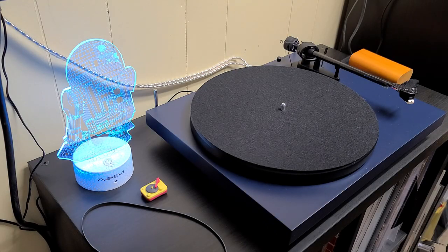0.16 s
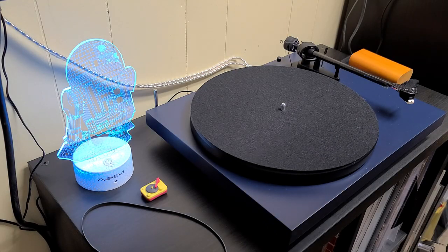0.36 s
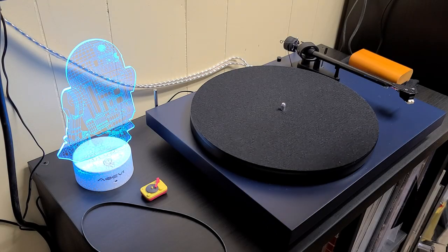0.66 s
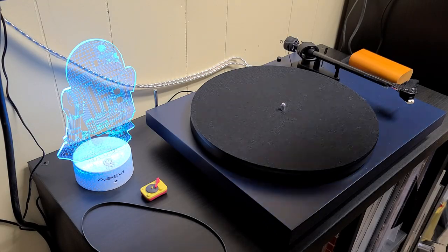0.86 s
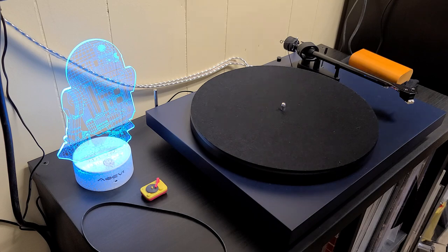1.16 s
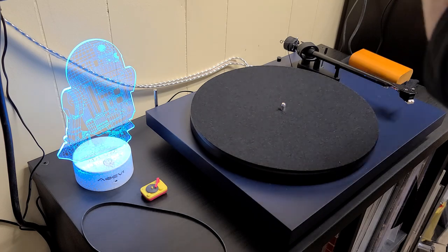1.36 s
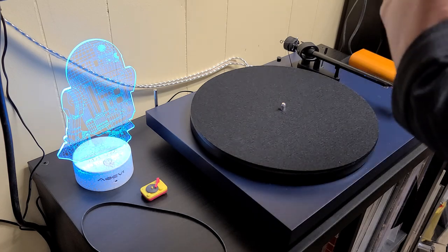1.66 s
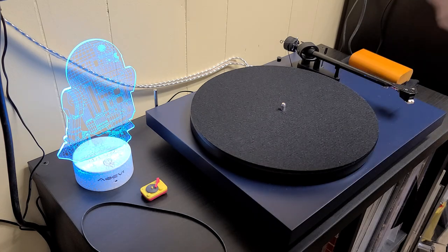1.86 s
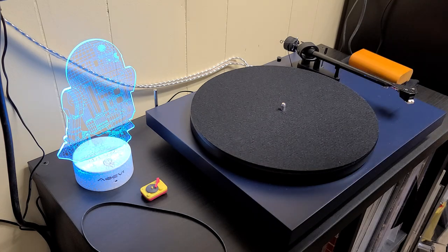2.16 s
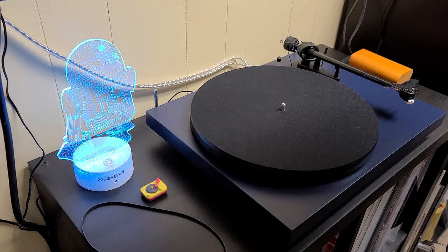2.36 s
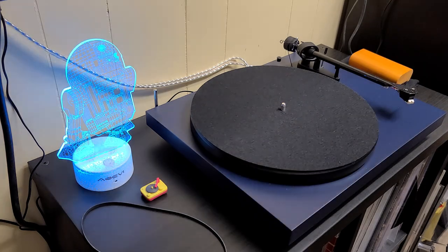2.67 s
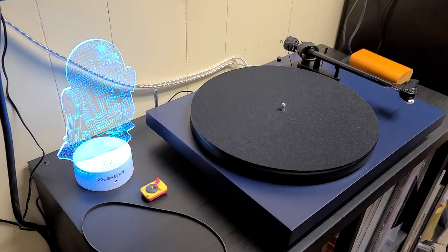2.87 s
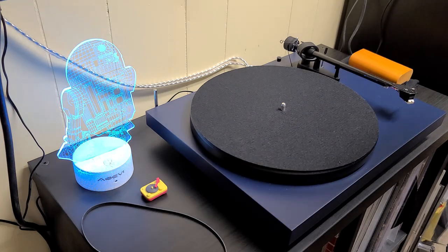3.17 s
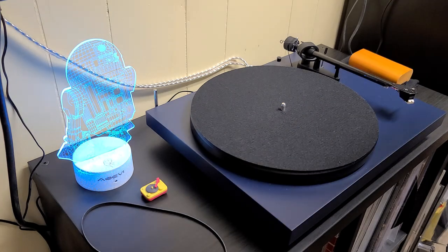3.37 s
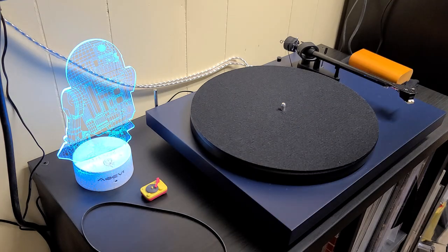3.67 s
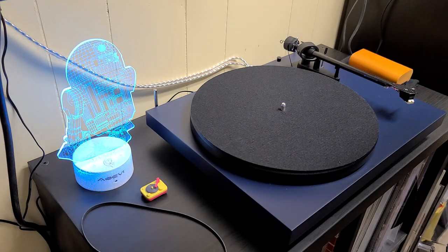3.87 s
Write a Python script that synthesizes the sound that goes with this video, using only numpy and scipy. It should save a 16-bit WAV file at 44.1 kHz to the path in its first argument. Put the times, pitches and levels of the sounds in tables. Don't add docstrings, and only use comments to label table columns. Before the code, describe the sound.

Close, dry paper rustling swells into crisp snaps and a single shelf knock, followed by squeaky sliding, light taps and two brief scrapes.

```python
import sys
import numpy as np
from scipy import signal
from scipy.fft import rfft, irfft, next_fast_len
from scipy.io import wavfile
from scipy.ndimage import uniform_filter1d

SR = 44100
rng = np.random.default_rng(int(sys.argv[2]) if len(sys.argv) > 2 else 0)


def master_out(mix):
    frames = np.transpose(np.atleast_2d(mix))
    ceiling = np.clip(frames, -1, 1)
    pcm = np.round(ceiling * 32767).astype(np.int16)
    wavfile.write(sys.argv[1], SR, pcm)


def elevation(decibels):
    levels = np.asarray(decibels, float)
    return 10 ** (levels / 20)


N = 177626


def evened(x):
    return x / np.sqrt(np.mean(x ** 2) + 1e-20)


def smooth_noise(size):
    return evened(uniform_filter1d(uniform_filter1d(rng.standard_normal(N), size), size))


def read(points, hz):
    f, value = np.transpose(points)
    return np.interp(np.log(hz + 1), np.log(f + 1), value)


def along(rows):
    s, *columns = np.transpose(rows)
    return [np.interp(np.arange(N) / SR, s, c) for c in columns]


def coloured(x, points):
    size = next_fast_len(N)
    gain = elevation(read(points, np.fft.rfftfreq(size, 1 / SR)))
    return evened(irfft(rfft(x, size) * gain, size)[..., :N])


def resonate(x, hz, width):
    r = np.exp(-np.pi * width / SR)
    return 2 * signal.lfilter([1 - r], [1, -r * np.exp(2j * np.pi * hz / SR)], x).real


def glide(x, hz, width):
    turn = np.exp(2j * np.pi * np.cumsum(hz) / SR)
    r = np.exp(-np.pi * width / SR)
    return 2 * (turn * signal.lfilter([1 - r], [1, -r], x / turn)).real


# pitch_hz, share
SHARED_PART = [(60, 0.7), (300, 1), (800, 0.46), (2000, 0.46), (5000, 0.024), (15000, 0.054)]
LATE_LEFT = 18


def paired(make, lag=LATE_LEFT):
    size = next_fast_len(N)
    same = np.clip(read(SHARED_PART, np.fft.rfftfreq(size, 1 / SR)), 0, 1)
    shared = make()
    common = rfft([np.roll(shared, lag), shared], size)
    alone = rfft([make(), make()], size)
    both = common * np.sqrt(same) + alone * np.sqrt(1 - same)
    return irfft(both, size)[:, :N]


def add(mix, s, sound, pan_db, lag=LATE_LEFT):
    at = round(s * SR)
    for channel, start, db in ((0, at + lag // 2, pan_db / 2), (1, at - lag // 2, -pan_db / 2)):
        part = mix[channel, start:][:len(sound)]
        part += elevation(db) * sound[:len(part)]


def slips(per_s, spread_db):
    size = elevation(spread_db * np.minimum(rng.exponential(1, N), 5)) * rng.standard_normal(N)
    return evened(size * (rng.random(N) < per_s / SR))


def flicker(size, depth_db):
    return elevation(depth_db * smooth_noise(size))


RISE_POWER, STOP_POWER, DIE_POWER = 1.84, 2.97, 1


def movement(full, rise, stop, stop_power=STOP_POWER):
    t = np.arange(0, N + 64, 64) / SR - full
    progress = np.where(t < 0, t / rise, t / stop)
    bend = np.where(t < 0, RISE_POWER, stop_power)
    return np.clip(progress, -1, 1), elevation(-40 * abs(progress) ** bend)


def filled(power):
    return np.interp(np.arange(N) / 64, np.arange(len(power)), np.sqrt(power))


# pitch_hz, level_db per Hz
AIR = [(60, -1.5), (125, -11), (250, -5), (600, -10.5), (1300, -19.5), (2800, -17.5), (4500, -24.5),
       (6000, -27.5), (11000, -25), (15600, -26.5)]
AIR_DB = -72.5
# time_s, first_level_db, second_above_first_db
HUM = [(1.7, -56, -20), (2.5, -63.5, 1), (3.4, -60, 3), (4.03, -68, 5)]
HUM_HZ, BEAT_HZ, DIP_S = 57.9, 2.16, 3.4


def air():
    hum = np.sqrt(2) * np.exp(2j * np.pi * np.cumsum(HUM_HZ + 2.54 * smooth_noise(4000)) / SR)
    first_db, second_db = along(HUM)
    beat = 1 - elevation(second_db) * np.exp(2j * np.pi * BEAT_HZ * (np.arange(N) / SR - DIP_S))
    hiss = coloured(rng.standard_normal((2, N)), AIR)
    return elevation(AIR_DB) * hiss + elevation(first_db - 15.0) * (hum * beat).imag


# full_s, rise_s, stop_s, level_db
SHIFTS = [(.15, 0.078, 0.15, -56.5), (.33, 0.15, 0.081, -61.5), (.58, 0.13, 0.18, -59),
          (.81, 0.048, 0.15, -59), (1.05, 0.24, 0.12, -53.5), (1.19, 0.034, 0.1, -51.5),
          (1.34, 0.12, 0.043, -68), (1.42, 0.056, 0.16, -67), (2.2, 0.13, 0.17, -63),
          (2.6, 0.094, 0.24, -72), (3.36, 0.018, 0.053, -72), (3.48, 0.036, 0.058, -73)]
# pitch_hz, level_db per Hz
RUMBLE_COLOUR = [(12, -58.5), (20, -4.5), (54, 2.5), (112, -3.5), (136, -7.5), (170, -7), (200, -12.5),
                 (300, -10), (390, -7), (660, -120)]


def rumble():
    power = elevation(2 * -72)
    for full, rise, stop, db in SHIFTS:
        power = power + elevation(2 * db) * movement(full, rise, stop)[1]
    jolts = paired(lambda: slips(360.0, spread_db=1.5))
    return elevation(-8.0) * filled(power) * coloured(jolts, RUMBLE_COLOUR) * elevation([[-1.2], [1.2]])


# full_s, rise_s, stop_s,
# sheet_level_db, fizz_above_sheet_db
PULLS = [(.15, 0.065, 0.14, -58, -3), (.225, 0.056, 0.038, -61, -3), (.39, 0.15, 0.16, -65.5, -3),
         (.53, 0.14, 0.077, -57.5, 3.5), (.595, 0.064, 0.021, -59, 1.5), (.73, 0.0099, 0.18, -65.5, -3),
         (.88, 0.12, 0.11, -70, 11), (1.03, 0.23, 0.062, -50, 1), (1.66, 0.055, 0.046, -76.5, 0),
         (1.908, .11, 0.29, -57, 5), (2.06, 0.27, 0.14, -57, -3.5), (2.14, 0.054, 0.039, -67.5, -1),
         (2.245, 0.11, 0.042, -65, 1.5), (2.3, 0.64, 0.039, -96.5, -33.5), (1.853, 0.013, 0.017, -62.5, 2),
         (2.45, 0.25, 0.28, -67, -6), (2.605, 0.13, 0.018, -66, -7.5), (2.68, 0.013, 0.027, -62.5, -8),
         (2.74, 0.19, 0.075, -67, -8), (2.92, 0.13, 0.12, -67, -2), (2.98, 0.086, 0.11, -76, -0.5),
         (3.08, .1, .2, -85, 2), (3.725, .04, 0.053, -82, 16), (3.93, 0.05, .045, -83, 16.5),
         (3.365, 0.016, .04, -75.5, 0)]
# full_s, rise_s, stop_s, sheet_level_db, fizz_above_sheet_db
CRUMPLES = [(1.1, 0.0081, 0.17, -60.5, 0.5), (1.155, 0.019, 0.026, -59.5, -6), (1.16, 0.014, 0.039, -64, 9),
            (1.198, 0.036, 0.038, -53.5, 1), (1.27, 0.078, 0.2, -68, 0), (1.41, 0.1, 0.0055, -67, 2.5),
            (1.467, 0.014, 0.1, -57, -7.5), (1.51, 0.011, 0.092, -52, -7.5), (1.528, 0.009, 0.017, -57, 2),
            (1.56, 0.006, 0.044, -51, -9), (1.571, 0.014, 0.012, -50, 3), (1.595, 0.031, 0.0089, -51.5, 1)]
# pitch_hz, level_db per Hz
FIZZ = [(2650, -47), (4500, -9), (4920, -4.5), (5400, -2), (7450, -0.5), (8060, 2), (11400, 2), (15600, -6)]
SHEET = [(880, -18.5), (1500, -9), (1660, -13), (1780, -7.5), (2380, -4), (2590, -0.5), (3540, 1.5),
         (6500, -12), (8450, -12), (14300, -120)]
POCKET = [(120, -53), (200, -17), (242, -17), (365, -7), (524, -2), (1400, -0.5), (1660, -2.5),
          (2200, -15.5), (2860, -57), (4840, -120)]
DULLING_DB = 1.5
POCKET_DB, POCKET_PER_FIZZ, SQUEEZE_DB, REST_DB = -8, -0.96, -0.5, -79
SLIDE_PAN_DB = -2.5


def slide():
    fizz, sheet, pocket = 0, 0, elevation(2 * REST_DB)
    for rows, squeeze_db, stop_power in ((PULLS, 0, STOP_POWER), (CRUMPLES, SQUEEZE_DB, DIE_POWER)):
        for full, rise, stop, db, fizz_db in rows:
            progress, power = movement(full, rise, stop, stop_power)
            pocket_db = db + POCKET_DB + POCKET_PER_FIZZ * fizz_db + squeeze_db
            fizz = fizz + power * elevation(2 * (db + fizz_db - DULLING_DB * progress))
            sheet = sheet + power * elevation(2 * db)
            pocket = pocket + power * elevation(2 * pocket_db)
    drive = paired(lambda: slips(14000., 1.3)) * flicker(size=100, depth_db=.8)
    out = filled(fizz) * coloured(drive, FIZZ) * flicker(size=400, depth_db=-1.0)
    out += filled(sheet) * coloured(drive, SHEET) * flicker(size=400, depth_db=0.77)
    out += filled(pocket) * coloured(drive, POCKET) * flicker(size=600, depth_db=2.2)
    return out * elevation([[SLIDE_PAN_DB / 2], [-SLIDE_PAN_DB / 2]])


def patchy(x, depth_db):
    z = signal.stft(x, nperseg=256)[2]
    field = rng.standard_normal(z.shape[1:])
    field = evened(uniform_filter1d(uniform_filter1d(field, size=3, axis=0), size=9, axis=1))
    gain = elevation(depth_db * field - 0.065 * depth_db ** 2)
    return signal.istft(z * gain, nperseg=256)[1][:, :N]


# start_s, peak_db, pitch_hz, cycles, sign
PUSHES = [(0.13, -63, 55, 1.4, 1), (.19, -60, 69.6, 1.6, 1), (0.236, -50.5, 61, 1.2, 1),
          (.263, -63, 45, 1.6, 1), (.402, -63, 62, 0.99, 1), (0.311, -58.5, 90, 1.2, 1),
          (0.476, -59, 60, 1, 1), (.522, -60, 50, 1.1, 1), (0.548, -54, 56.3, 2.5, -1),
          (0.605, -58, 57.7, 1.46, 1), (0.624, -57, 61.3, 1.8, 1), (.664, -59, 80, 1.63, -1),
          (.79, -56, 62, 1.85, 1), (0.841, -56.5, 51, 1.48, 1), (0.894, -58, 59.7, 1.24, 1),
          (1.16, -57, 55, 1.2, 1), (1.213, -58.5, 60.4, 1.7, 1), (1.547, -42.5, 60, 1.9, -1),
          (1.578, -39, 40.6, 1.38, 1), (1.5867, -20.7, 64.5, 1.566, -1), (1.664, -47, 85, 1.7, -1)]
# start_s, peak_db, contact_ms, sign
CONTACTS = [(1.5897, -30, 1.6, -1), (1.5915, -30, 1.3, 1), (1.5935, -26.5, 0.44, 1), (1.602, -27.5, 1.3, 1),
            (1.6037, -15.5, 0.37, 1), (1.6039, -24, 0.56, -1), (1.6036, -33, 1.1, -1),
            (1.6087, -42, 0.4, -1), (1.609, -25.5, 0.96, -1), (1.6116, -31.5, 0.83, 1),
            (1.613, -41, 0.4, 1), (1.616, -39, 0.9, -1)]
# pitch_hz, level_db, t60_s
SHELF = [(368, -8, 0.11), (576, -22, 0.19), (620, -11, 0.079), (736, -7, 0.035), (858, 3, 0.059),
         (1270, -23, 0.041), (1430, -7, 0.073), (1954, -39, 0.088)]


def knock():
    out, blows, t = np.zeros((2, N)), np.zeros(N), np.arange(8000) / SR
    for s, db, hz, cycles, sign in PUSHES:
        turn = np.arange(0, cycles, hz / SR)
        push = np.sin(2 * np.pi * turn) * signal.windows.tukey(len(turn), .3)
        add(out, s, np.sign(sign) * elevation(db) * push, -3.4, lag=18)
    for s, db, ms, sign in CONTACTS:
        u = (np.arange(N) / SR - s) * 1000 / ms
        blows += np.sign(sign) * elevation(db) * np.exp(-8 * (u - .5) ** 2)
    board = sum(elevation(db - 60 * t / t60) * np.sin(2 * np.pi * hz * t) for hz, db, t60 in SHELF)
    heard = blows + elevation(-39) * signal.oaconvolve(blows, board)[:N]
    crunch = evened(resonate(resonate(rng.standard_normal(len(t)), 1000.0, 1400.0), 690.0, 2000.0))
    squeeze = (t / 0.014) ** 2 * np.exp(2 - 2 * t / 0.0086)
    add(out, 1.59, elevation(-31.0) * crunch * squeeze, -2.5)
    return out + np.array([np.roll(heard, LATE_LEFT - 6), heard]) * elevation([[-1.6], [1.6]])


# start_s, peak_db, pitch_hz, length_s
TAPS = [(0.368, -54.5, 363, 0.045), (0.557, -54, 300, 0.027), (0.66, -61, 337, 0.024),
        (1.099, -55, 334, 0.035), (0.153, -65, 140, 0.053), (0.303, -63, 450, .03),
        (0.621, -58, 170, 0.046), (0.666, -63, 150, 0.039), (1.416, -53, 330, 0.016),
        (1.468, -59, 150, 0.042), (0.478, -63, 395, 0.019), (.62, -60, 400, 0.029),
        (1.176, -44, 1520, 0.016), (1.1927, -32, 1460, 0.0062), (1.417, -35, 1330, 0.0038),
        (1.514, -44, 800, 0.012), (2.321, -58.5, 640, 0.021), (2.332, -55, 685, 0.0079),
        (3.836, -66.5, 1290, 0.024), (1.457, -51, 805, 0.028), (1.515, -39.5, 174, 0.032),
        (1.517, -42.5, 500, 0.037), (1.527, -48, 620, 0.0078), (1.595, -42, 900, 0.044),
        (1.664, -56, 710, 0.029), (2.198, -53.5, 656, 0.063), (2.45, -53.5, 1140, 0.014),
        (2.563, -45, 386, 0.014), (2.581, -44, 1160, 0.022), (2.67, -57, 960, 0.011),
        (2.774, -64, 1130, 0.026), (2.868, -59, 544, 0.024), (2.957, -54.5, 585, 0.021),
        (3.014, -56.5, 583, 0.03), (3.342, -48.5, 1440, 0.02), (3.356, -44.5, 1030, 0.02),
        (3.44, -55, 576, 0.11), (3.455, -46.5, 800, 0.031), (3.481, -50, 202, 0.076),
        (3.495, -61, 406, 0.1), (3.551, -52.5, 800, 0.033), (3.777, -47.5, 377, 0.04),
        (3.887, -54, 230, 0.02), (3.889, -53.5, 3570, 0.037), (4.014, -38, 640, 0.12)]


def taps():
    out, t = np.zeros((2, N)), np.arange(6000) / SR
    for (s, db, hz, length), noise in zip(TAPS, rng.standard_normal((len(TAPS), 6000))):
        page = evened(resonate(resonate(noise, hz, 0.38 * hz), hz, 6.8 * hz))
        page += 0.21 * evened(resonate(resonate(noise, 760.0, 1300.0), 1400.0, 3297.0))
        page += 0.033 * evened(resonate(noise, 2200.0, 1200.0))
        hiss = evened(resonate(resonate(noise, 4800., 3500.), 4800., 3500.))
        page += elevation(-20) * min(hz / 900, 1) * hiss
        shape = (1 - np.exp(-t / (0.064 * length))) ** 2 * elevation(-30 * t / max(length, .004))
        add(out, s, elevation(db - 2) * page * shape, pan_db=0.5, lag=2)
    return out


# time_s, left_over_right_db
SLEEVE_PAN = [(1.1, -5.5), (1.18, -7), (1.2, -4.5), (1.6, -6.5), (3.4, 2)]


def sleeve_pan(s):
    return np.interp(s, *np.transpose(SLEEVE_PAN))


# start_s, peak_db, pitch_hz
TICKS = [(0.5943, -38, 2860), (.8271, -45, 8100), (1.1385, -35, 9000), (1.16, -32, 11000),
         (1.161, -34, 8600), (1.1664, -42, 8500), (1.1692, -42, 12000), (1.179, -37, 8000),
         (1.1805, -68, 12500), (1.1858, -34, 1850), (1.194, -24.5, 10300), (1.202, -31, 12100),
         (1.227, -44, 2880), (1.3995, -51, 2950), (1.406, -49, 2500), (1.4176, -24.5, 5970),
         (1.4178, -24, 8800), (1.4225, -50, 8500), (1.4558, -44, 8800), (1.4622, -43, 9200),
         (1.469, -53.5, 8500), (1.4863, -46, 2900), (1.492, -46, 7000), (1.495, -38, 8000),
         (1.501, -40, 8900), (1.4994, -36, 3140), (1.5065, -33, 5500), (1.513, -39, 10000),
         (1.5225, -38, 8440), (1.525, -26.5, 8200), (1.5268, -47, 9000), (1.532, -50, 8500),
         (1.5545, -54, 3500), (1.559, -39, 8000), (1.569, -37, 5700), (1.5715, -38, 8500),
         (1.5725, -43, 13000), (1.584, -28, 8800), (1.582, -46, 3400), (1.59, -40, 9000),
         (1.594, -51, 9200), (1.852, -37, 4800), (1.998, -44, 3600), (2.074, -41, 2600), (2.333, -64, 1600),
         (2.768, -55, 1090), (3.3437, -40.5, 8450)]
TICK_CYCLES = 3.46


def ticks():
    out, t = np.zeros((2, N)), np.arange(300) / SR
    for (s, db, hz), noise in zip(TICKS, rng.standard_normal((len(TICKS), 300))):
        ring = np.sin(2 * np.pi * hz * t) * np.exp(-t * hz / TICK_CYCLES) * (1 - np.exp(-t * hz))
        click = 0.15 * noise * np.exp(-t / 0.00066)
        add(out, s - .0002, elevation(db) * (ring + click), sleeve_pan(s), lag=12)
    return out


# start_s, peak_db, pitch_hz, ring_ms
PLUCKS = [(1.138, -39, 2700, 1.), (1.1422, -29, 2260, 1), (1.161, -39, 2600, 1.1), (1.18, -24, 2400, 1.1),
          (1.204, -34, 2660, 1.2), (1.5143, -37, 750, 1.), (1.5902, -36, 3200, 1.3),
          (1.5955, -40, 2100, 1.8), (1.6125, -37, 1300, 1.5), (1.6172, -29, 750, 1.),
          (1.6235, -34, 800, 1.5), (1.6275, -38, 550, 2.), (1.5985, -35, 426, 4.4), (1.608, -37, 2300, 1.5),
          (.665, -62, 900, 2.), (3.4405, -57, 745, 3.), (2.564, -43, 510, 1.5), (2.5848, -40.5, 970, 2.7),
          (2.682, -48, 1010, 2.3), (2.682, -48, 2810, 2.2), (3.343, -47, 2850, 1.4),
          (3.3565, -42.5, 620, 3.2), (3.559, -48, 1090, 3.), (3.893, -48, 2170, 3.4)]


def plucks():
    out, t = np.zeros((2, N)), np.arange(1500) / SR
    for s, db, hz, ms in PLUCKS:
        ring = np.sin(2 * np.pi * hz * t) * (1 - np.exp(-t * hz)) * np.exp(-1000 * t / ms)
        add(out, s, elevation(db) * ring, sleeve_pan(s), lag=12 if s < 2 else 4)
    return out


# full_s, rise_s, stop_s, level_db,
# pitch_hz
WHISTLES = [(0.951, 0.054, .1, -51.5, 1390), (1.0, 0.082, .08, -65, 2100), (1.07, 0.049, 0.043, -60, 2300),
            (3.84, 0.01, 0.015, -69, 1320), (1.21, 0.037, 0.04, -56.5, 619),
            (3.79, 0.027, 0.037, -56.5, 370), (1.468, 0.012, 0.014, -55, 1430),
            (1.85, .015, 0.019, -61.5, 870), (1.918, .015, .03, -59, 860), (2.001, 0.033, .04, -56.5, 3160),
            (2.045, 0.033, .04, -61.5, 2820), (2.067, 0.046, 0.025, -46, 1180),
            (2.095, 0.039, 0.028, -57, 1574), (2.09, 0.042, 0.041, -60.5, 2140),
            (2.27, 0.053, 0.069, -69, 553), (3.466, 0.01, 0.01, -75, 3100),
            (0.791, 0.035, 0.033, -69.5, 2950), (.965, 0.026, .03, -53, 3200),
            (1.04, 0.035, 0.023, -59.5, 2800), (1.04, .02, .03, -54, 3150), (1.01, 0.041, .05, -57, 1390)]
WHISTLE_SHARPNESS, WHISTLE_GLIDE = 20., .03


def whistles():
    out = np.zeros((2, N))
    for (full, rise, stop, db, hz), noise in zip(WHISTLES, rng.standard_normal((len(WHISTLES), 12000))):
        t = np.arange(len(noise)) / SR - 1.56 * rise
        progress = np.where(t < 0, t / rise, t / stop)
        pitch = hz * (1 + WHISTLE_GLIDE * np.clip(progress, -1, 1))
        width = hz / WHISTLE_SHARPNESS
        tone = evened(glide(glide(noise, pitch, width), pitch, 5.2 * width))
        add(out, full - 1.6 * rise, elevation(db - 20 * progress ** 2) * tone, SLIDE_PAN_DB)
    return out


# start_s, peak_db, sheet_pitch_hz, tick_above_sheet_db
SNAPS = [(1.0976, -41, 3010, -2), (1.1238, -46, 2630, -1), (1.1387, -35, 2700, -6), (1.1428, -34, 2260, 1),
         (1.1509, -30, 5600, 1), (1.1603, -42, 2560, -8), (1.1807, -27, 2300, -10), (1.1836, -41, 1510, -2),
         (1.1941, -20.5, 4150, -14), (1.1992, -39, 4100, -10), (1.2053, -40, 2110, -3),
         (1.266, -50, 3080, -1), (1.3674, -46, 2690, -1), (1.4021, -45, 3360, 2), (1.4177, -30, 3300, -3),
         (1.4222, -44, 5150, 0), (1.4621, -46, 1790, -7), (1.4799, -44, 1590, -4), (1.4996, -34, 5510, 2),
         (1.5223, -41, 3680, -2), (1.5249, -33, 4720, -3), (1.5316, -37, 1510, -4), (1.5566, -37, 2910, -3),
         (1.5656, -36, 5920, -3), (1.5706, -35, 5660, -4), (1.911, -41, 5530, 2), (2.0193, -42, 3170, -3),
         (2.5861, -37, 3210, -7), (2.6819, -44, 5430, -5), (3.344, -49, 1570, 0)]


def snaps():
    out, t = np.zeros((2, N)), np.arange(900) / SR
    pop = np.cos(2 * np.pi * 800 * t) * np.exp(-((t - .0004) / .0004) ** 2)
    for (s, db, hz, tick_db), noise in zip(SNAPS, rng.standard_normal((len(SNAPS), 2, 900))):
        ring = np.sin(2 * np.pi * hz * t) * (1 - np.exp(-t / .0001)) * np.exp(-t / .0003)
        tick = resonate(resonate(noise[0] * np.exp(-t / .0003), 8000., 5000.), 8500., 7000.)
        rattle = resonate(noise[1], hz, 3500.) * np.exp(-t / .003)
        crack = ring / ring.max() + elevation(tick_db + 2.5) * tick / abs(tick).max() + elevation(-26) * pop
        gap = 16 + int(8 * abs(noise[1, 0]))
        crack[gap:] -= .2 * crack[:-gap]
        add(out, s - .0002, elevation(db - 1) * (crack + elevation(-19) * rattle), sleeve_pan(s), lag=gap - 6)
    return out


# time_s, level_db
STROKES = [
    [(3.68, -81), (3.697, -58.5), (3.71, -49), (3.725, -48.5), (3.738, -45.5), (3.763, -51), (3.772, -56),
     (3.798, -78), (3.82, -94)],
    [(3.885, -87), (3.891, -54.5), (3.915, -51.5), (3.955, -52), (3.965, -58), (3.972, -62), (3.982, -68),
     (4.005, -66)],
]
# pitch_hz, width_hz, level_db
CARD = [
    [(360, 140, -7.5), (800, 16, 4), (960, 21, -5), (1167, 35, 8), (1300, 64, -9), (2930, 200, -7.5),
     (3300, 105, -2), (4370, 100, -17)],
    [(370, 88, 15), (900, 240, 0), (1275, 86, 10), (2100, 72, -9), (2400, 87, -1), (3330, 120, -2),
     (3790, 70, -2)],
]
# starting_share_of_pitch, settle_s
LOW_GLIDE = [(0.98, .03), (0.42, 0.027)]
STROKE_TOP_HZ = [7000., 4300.]
# pitch_hz, level_db per Hz
GRAIN = [(150, -11), (400, -11), (1200, 6), (2200, -6), (3400, -11), (5000, -40), (9000, -46), (15600, -64)]


def scrapes():
    out, t = np.zeros((2, N)), np.arange(N) / SR
    for rows, (low, *peaks), (share, settle), top_hz in zip(STROKES, CARD, LOW_GLIDE, STROKE_TOP_HZ):
        begin, end = rows[0][0], rows[-1][0]
        drive = paired(lambda: slips(6000., 0.37), lag=2) * flicker(size=150, depth_db=1.3)
        pitch = low[0] * (1 + (share - 1) * np.exp(-np.maximum(t - begin, 0) / settle))
        page = elevation(low[2]) * glide(drive, pitch, low[1])
        page = page + sum(elevation(db) * resonate(drive, hz, width) for hz, width, db in peaks)
        inside = uniform_filter1d(1. * (t > begin) * (t < end), size=100)
        page = page / np.std(page[:, inside > 0]) + elevation(-5) * coloured(drive, GRAIN)
        page = signal.lfilter(*signal.butter(2, top_hz, fs=SR), page)
        out += elevation(along(rows)[0]) * page * inside
    return out


# pitch_hz, t60_s
ROOM = [(200, 0.053), (1000, 0.094), (4000, 0.048), (12000, 0.032)]


def room(x):
    echoes = np.zeros((2, SR // 2))
    at = np.arange(120, SR // 2 - 20, 20) + rng.integers(0, 20, (2, (SR // 2 - 121) // 20))
    np.put_along_axis(echoes, at, rng.choice([-1., 1.], at.shape), 1)
    hz, t, z = signal.stft(echoes, SR, nperseg=256)
    tail = signal.istft(z * elevation(-60 * t / read(ROOM, hz + 1)[:, None]), SR, nperseg=256)[1]
    return signal.fftconvolve(x, tail / np.linalg.norm(tail[0]), axes=1)[:, :N]


def scene():
    creases = snaps() + ticks() + plucks()
    hits = taps() + scrapes()
    blow = knock()
    wet = elevation(-15) * creases + elevation(-9) * hits + elevation(-18) * blow
    struck = creases + hits + blow + room(wet)
    paper = patchy(slide(), depth_db=2.0) + whistles()
    return struck + paper + rumble() + air()


def top_cut(x):
    return signal.sosfilt(signal.butter(12, 16610, fs=SR, output="sos"), x)


def record(dry):
    limit = signal.firwin(511, 15800, window=("kaiser", 5), fs=SR)
    mix = signal.oaconvolve(dry, limit[None], "same")
    return top_cut(mix)


dry = scene()
out = record(dry)
master_out(out)
```